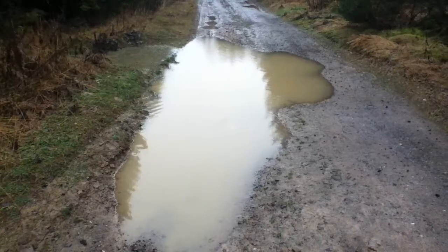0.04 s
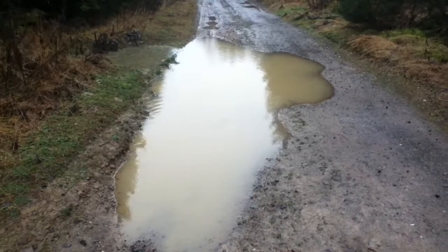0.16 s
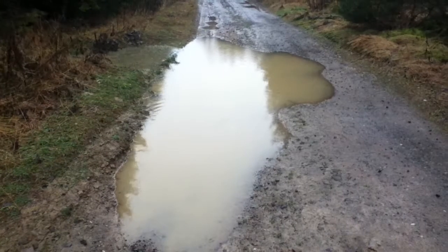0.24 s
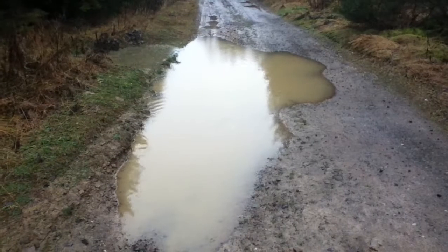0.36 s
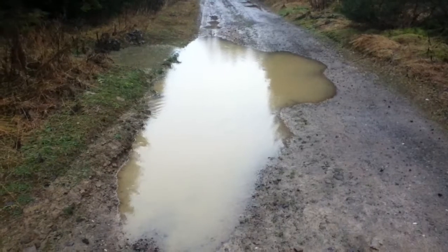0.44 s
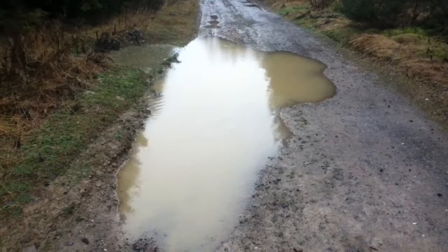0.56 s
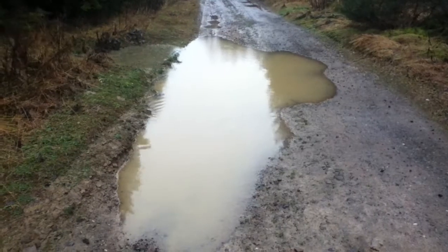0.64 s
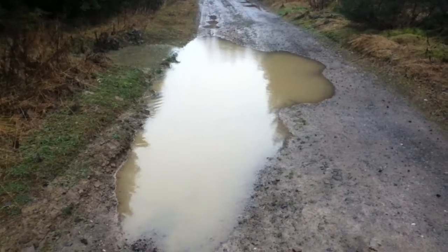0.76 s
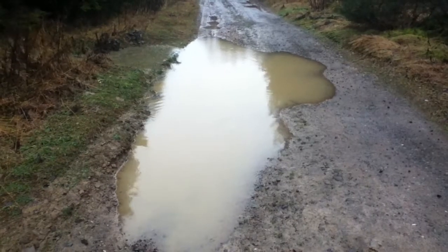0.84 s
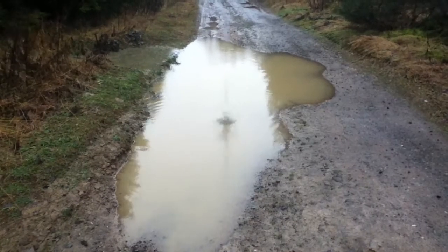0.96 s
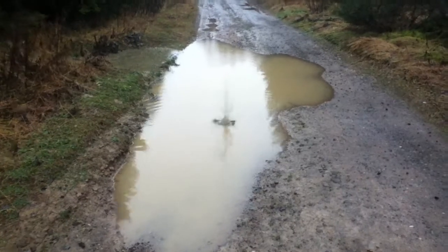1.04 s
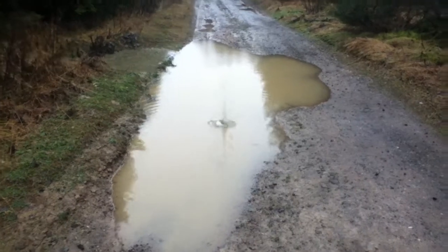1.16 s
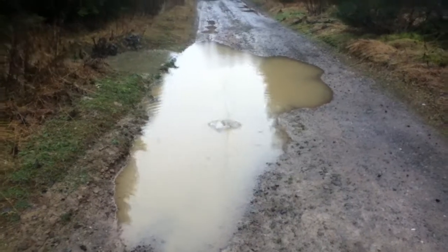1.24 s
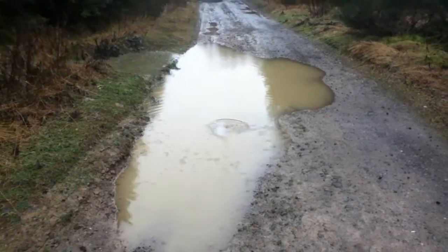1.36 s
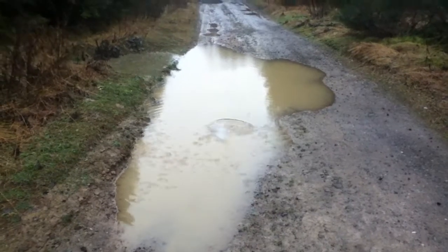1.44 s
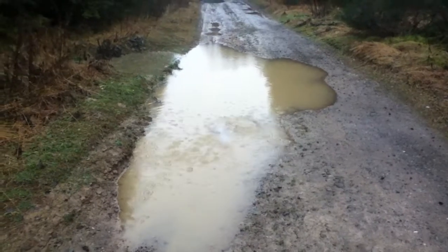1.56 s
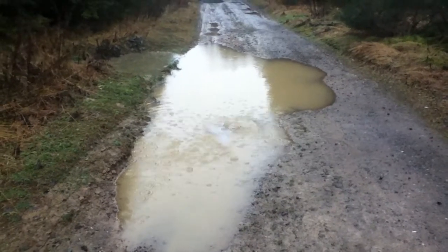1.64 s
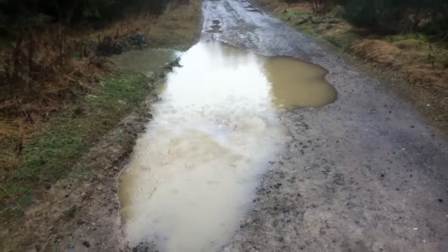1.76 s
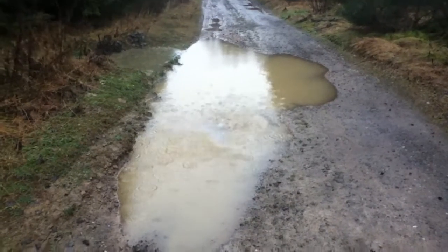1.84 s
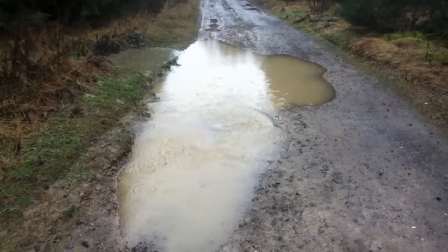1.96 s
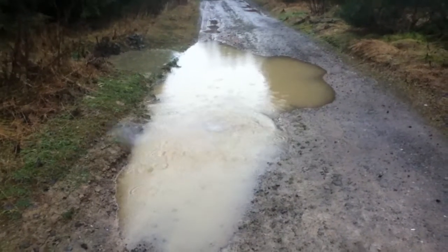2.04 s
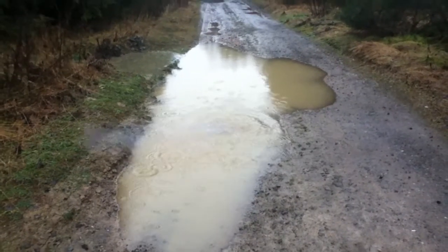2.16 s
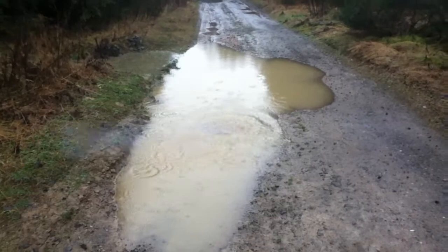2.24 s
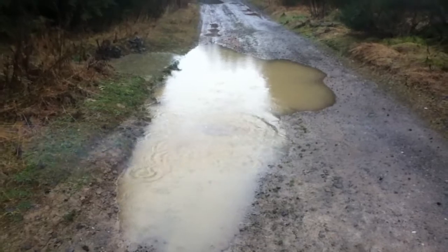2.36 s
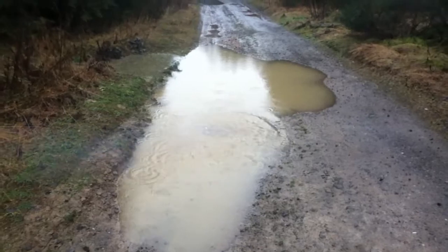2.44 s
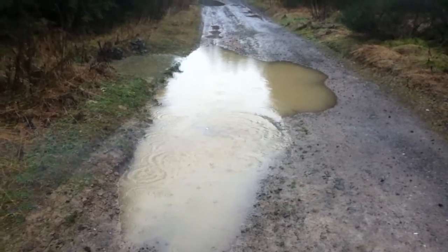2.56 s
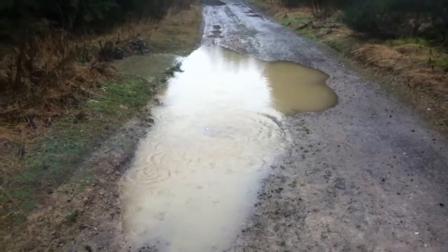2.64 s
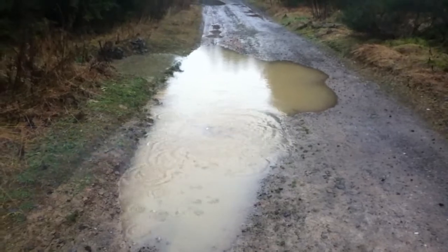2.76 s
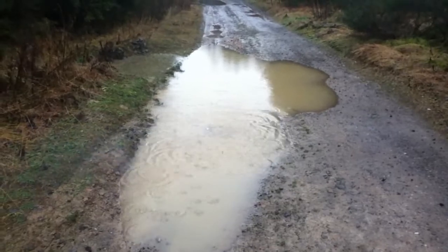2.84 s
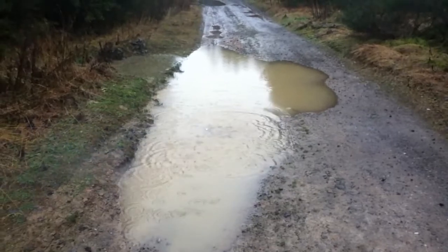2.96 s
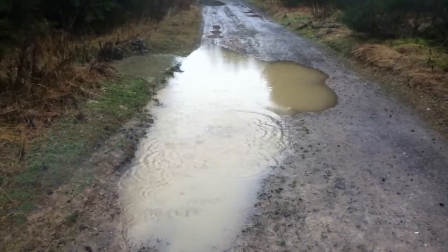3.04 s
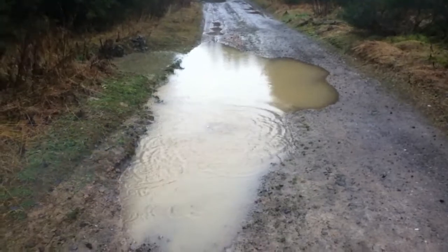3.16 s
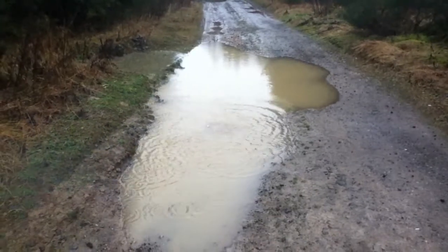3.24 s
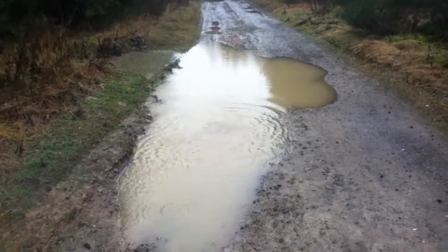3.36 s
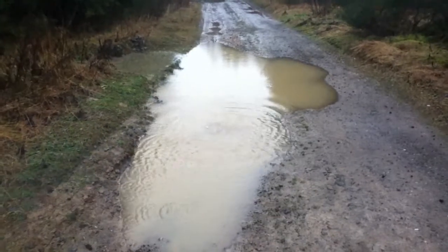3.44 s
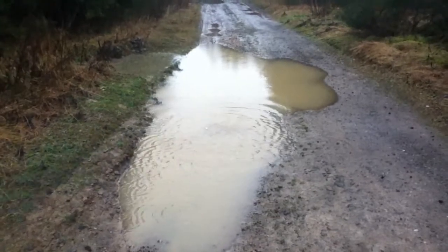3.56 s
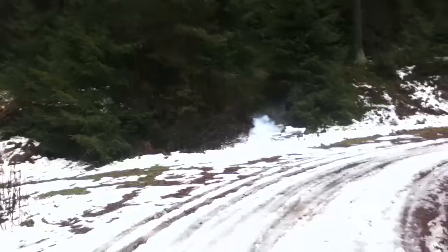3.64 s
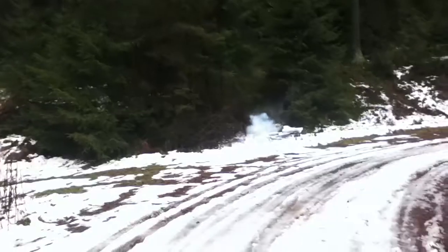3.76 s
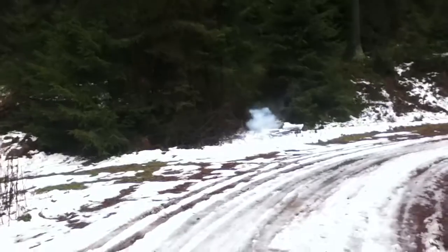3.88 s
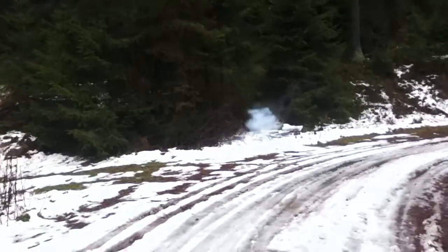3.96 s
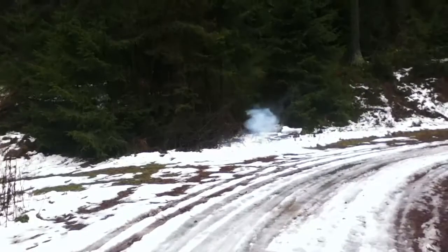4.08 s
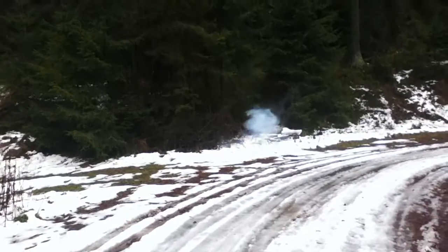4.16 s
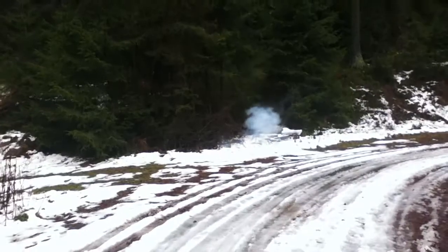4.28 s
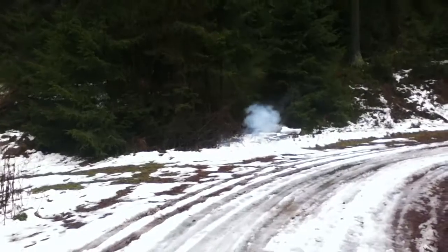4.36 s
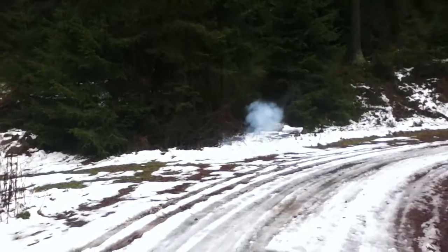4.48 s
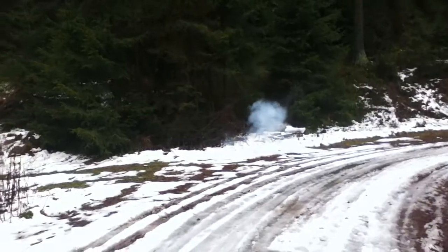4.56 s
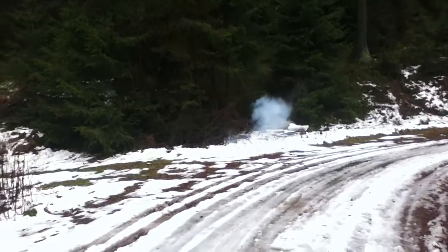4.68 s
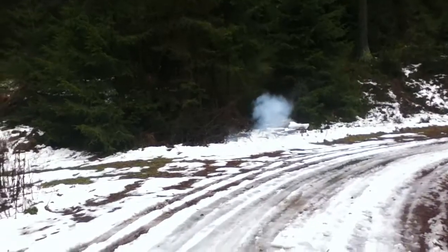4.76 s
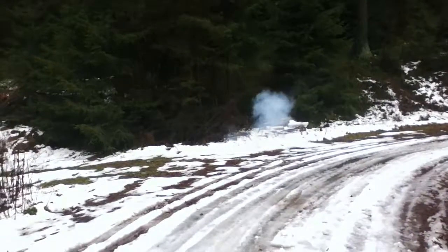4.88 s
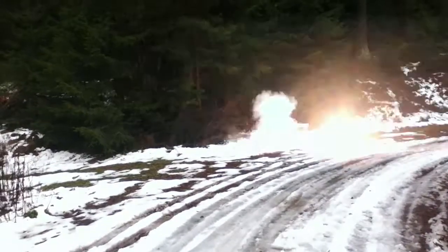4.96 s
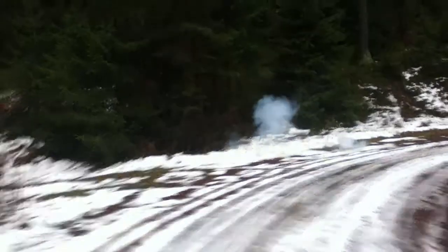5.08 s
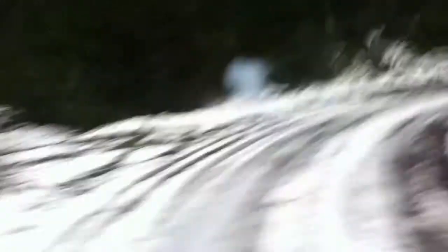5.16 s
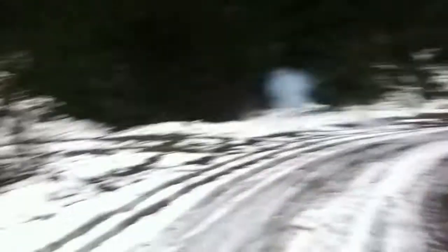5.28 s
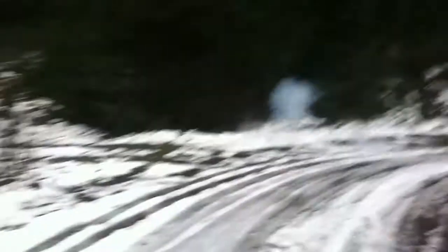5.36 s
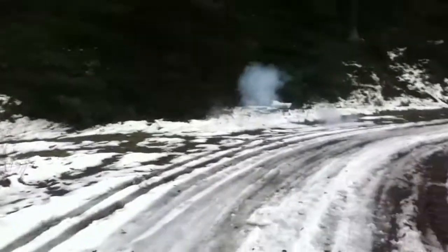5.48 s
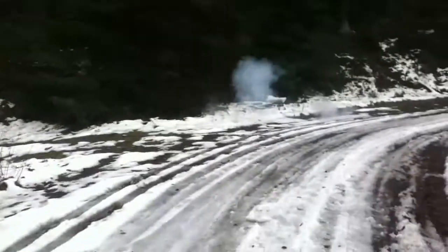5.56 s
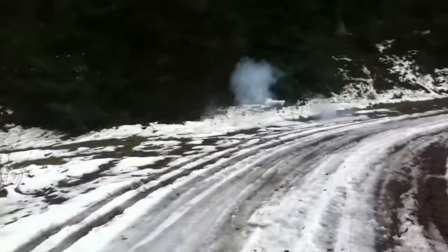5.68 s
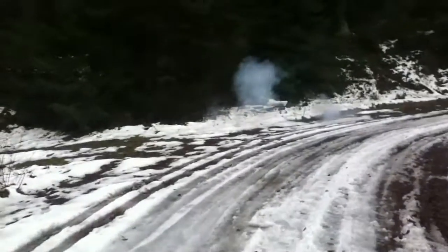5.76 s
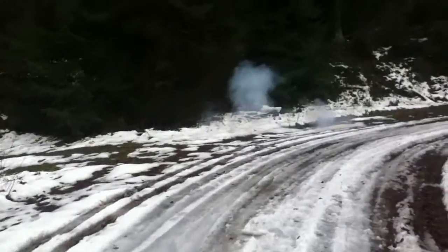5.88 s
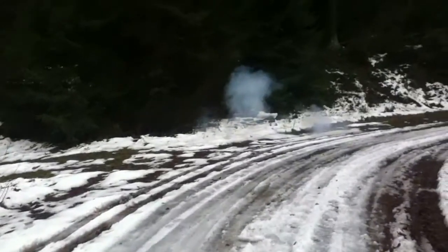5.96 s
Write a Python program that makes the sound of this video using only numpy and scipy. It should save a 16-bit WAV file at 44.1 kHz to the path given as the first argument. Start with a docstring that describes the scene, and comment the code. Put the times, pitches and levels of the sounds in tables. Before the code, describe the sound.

Two firecrackers on woodland tracks, heard on a small overloading microphone. First quiet air and wind bumps, then a blunt splashy explosion in a puddle, followed by a spatter of bubbly drops thinning to drips and stray clicks. The place changes abruptly to a snowy forest with a dull, hollow echo fading and light rustling. A hard, crackling bang follows, with rapid slapback shocks and a long grainy rumble still sounding at the end.

```python
"""Two firecrackers on forest tracks

Wind bumps a small microphone; a cracker heaves and bursts a puddle, and the thrown water patters back as
decaying noise and rising bubble chirps. The scene jumps to a snowy wood where an earlier echo still rolls:
filtered noise, each band dying at its own rate. Soft hisses pass, then a second cracker bangs as flat-topped
shocks and the trees scatter it. A limiter ducks the loudest moments."""
import sys
import numpy as np
from scipy import signal
from scipy.io import wavfile
from scipy.ndimage import uniform_filter1d, minimum_filter1d

SR = 44100
rng = np.random.default_rng(int(sys.argv[2]) if len(sys.argv) > 2 else 0)


def waveform_to_disk(signal):
    """Save audio, clipped to [-1, 1], as 16-bit WAV at the path in sys.argv[1]."""
    frames = np.transpose(np.atleast_2d(signal))
    scaled = np.clip(frames, -1, 1) * 32767
    samples = np.round(scaled).astype(np.int16)
    wavfile.write(sys.argv[1], SR, samples)


N = 265305
TIME = np.arange(N) / SR
PUDDLE_S, JUMP_S, BANG_S = 1.0365, 3.599, 5.1233   # puddle blast, jump to the wood, onset of the bang's echo


def from_db(db):
    """A level in decibels is twenty times the logarithm of the amplitude ratio."""
    return 10 ** (np.asarray(db) / 20)


def rms_one(x):
    """Normalise to unit root-mean-square amplitude."""
    return x / np.sqrt(np.mean(x ** 2) + 1e-20)


def at_hz(points, hz):
    """Interpolate a curve along logarithmic frequency."""
    curve_hz, values = np.transpose(points)
    return np.interp(np.log(hz), np.log(curve_hz), values)


def passed(x, hz, kind, order=2):
    """A Butterworth filter has a maximally flat pass band."""
    corner_hz = np.clip(hz, 10, .45 * SR)
    sections = signal.butter(order, corner_hz, kind, fs=SR, output="sos")
    return signal.sosfilt(sections, x + 1e-18)


def dying(age, t60):
    """Exponential decay by 60 dB in t60 seconds, silent before age zero."""
    return (age >= 0) * np.exp(-np.log(1000) * np.maximum(age, 0) / t60)


def bell(age, width):
    """A Gaussian envelope of height 1 at age zero; width is its standard deviation."""
    return np.exp(-.5 * (age / width) ** 2)


def drift(rate):
    """Two equal low-pass poles at rate (Hz) turn white noise into a smooth random curve of unit rms."""
    step = 40   # samples between the points of the slow curve
    pole = np.exp(-2 * np.pi * rate * step / SR)
    white = rng.standard_normal(N // step + 2002)
    slow = signal.lfilter([1], [1, -2 * pole, pole * pole], white)[2000:]   # skip the settling
    return np.interp(np.arange(N) / step, np.arange(len(slow)), rms_one(slow))


def bands(spectrum, grain_db=0):
    """Third-octave noise bands summing to unit power, and their centres; grain makes single arrivals stand out."""
    edges = np.geomspace(22, 15900, 29)
    centres = np.sqrt(edges[1:] * edges[:-1])
    gains = from_db(at_hz(spectrum, centres))
    grain = from_db(grain_db * rng.standard_normal(N))
    white = rms_one(rng.standard_normal((2, N)) * grain)
    # neighbouring bands draw on different noises
    rows = np.array([gain * passed(white[k % 2], edges[k:k + 2], "band", order=3)
                     for k, gain in enumerate(gains)])
    return rows / rows.sum(axis=0).std(), centres


def noise(spectrum):
    """Stationary coloured noise of unit rms is the sum of its bands."""
    return bands(spectrum)[0].sum(axis=0)


def add(out, s, sound):
    """Superpose a short sound at time s."""
    start = int(np.clip(round(s * SR), 0, N))
    out[start:start + len(sound)] += sound[:N - start]


def puddle_air():
    """The hiss of the air among the trees at the puddle is broadband noise of slowly changing level."""
    # spectral density of the hiss: f/Hz, density/dB
    air_colour = [(18, -30), (30, -4), (147, -2), (374, -8), (567, -3), (859, -7), (1480, -12.5),
                  (2080, -17), (4090, -20.5), (6360, -21.5), (15000, -27.5)]
    # level of the hiss: t/s, level/dB
    air_level = [(0, -48), (1.0, -49), (1.6, -55), (3.6, -49)]
    times, levels = np.transpose(air_level)
    return from_db(np.interp(TIME, times, levels)) * noise(air_colour)


def wood_air():
    """The air of the snowy wood is steady broadband noise."""
    # spectral density of the hiss: f/Hz, density/dB
    wood_colour = [(30, -14), (120, 3), (400, 0.5), (1200, -1), (3000, -11), (8000, -23), (15000, -34.5)]
    return from_db(-41.0) * noise(wood_colour)


def hissing(rise_share=0.23):
    """Noise under a gamma envelope: each hiss swells quickly and fades more slowly."""
    # soft hisses in the snowy wood: t/s, peak level/dB, length/s
    hiss_table = [(4.162, -44, 0.096), (4.354, -53.5, 0.33), (4.694, -48.5, 0.48), (5.72, -45, .02),
                  (5.81, -44, 0.023), (5.913, -47, .3)]
    # spectral density of a hiss: f/Hz, density/dB
    hiss_colour = [(500, -34), (2500, -6), (4500, 1.5), (7000, -5.5), (11000, -7), (15000, -24)]
    level = np.zeros(N)
    for s, db, length in hiss_table:
        age = np.maximum(TIME - s, 0) / (rise_share * length)   # in rise times
        level += from_db(db) * age * np.exp(1 - age)
    return level * noise(hiss_colour)


def wind(breeze_db=-63, eddy_cycles=0.51):
    """Turbulent pressure swells in gusts, and single eddies rock the diaphragm for a cycle or two."""
    # gusts on the microphone: t/s of the peak, level/dB, Gaussian width/s
    gust_table = [(0, -44.5, 0.06), (0.729, -26, 0.045), (0.896, -34.5, 0.046)]
    # single eddies: t/s, level/dB, f/Hz
    eddy_table = [(0.01, -27.5, 96), (.088, -28, 99), (.71, -14, 136), (.735, -10.5, 180),
                  (.755, -11.5, 152), (0.831, -15.5, 128), (2.92, -35, 87.4)]
    # spectral density of the turbulence: f/Hz, density/dB
    wind_colour = [(25, -7), (70, -4), (135, 0), (220, -5), (400, -21), (1000, -39), (4000, -76)]
    gusts = sum(from_db(db) * bell(TIME - s, width) for s, db, width in gust_table)
    out = (from_db(breeze_db) + gusts) * noise(wind_colour)
    for s, db, hz in eddy_table:
        age = TIME - s
        phase = rng.uniform(0, 2 * np.pi)
        out += from_db(db) * bell(age, eddy_cycles / hz) * np.cos(2 * np.pi * hz * age + phase)
    return out


def ticks(spread=1.25, grit_db=-14):
    """An impulsive contact and its brief gritty decay excite a band around a pitch of their own."""
    # sharp slaps, ticks and crunches close by: t/s, peak level/dB, centre f/Hz, t60/s
    tick_table = [(0.7134, -18.5, 1430, 0.015), (1.3925, -33, 2160, 0.12), (1.5002, -30.5, 3330, .025),
                  (2.034, -39, 1630, 0.034), (2.4967, -30.5, 1760, 0.014), (2.6444, -28.5, 7650, 0.012),
                  (2.8882, -30, 4000, 0.027), (2.915, -35.5, 3340, .04), (2.977, -25.5, 1320, 0.0086),
                  (3.364, -31.5, 1900, 0.0092), (3.526, -25, 2180, 0.009)]
    out, age = np.zeros(N), TIME[:SR // 10]
    for s, db, hz, t60 in tick_table:
        grit = from_db(grit_db) * rng.standard_normal(len(age)) * dying(age, t60)
        force = (age == 0) + grit
        crack = passed(force, [hz / spread, hz * spread], "band", order=1)
        crack = passed(crack, 2 * hz, "low")
        add(out, s, from_db(db) * crack / np.abs(crack).max())
    return out


def bubble(hz, width, rise=0.21):
    """A bubble's resonance swells and shoots up in pitch as it meets the surface of the shallow water."""
    age = np.arange(-3 * width, 3 * width, 1 / SR) / width
    pitch = np.minimum(hz * np.exp(rise * age), .45 * SR)
    return np.sin(2 * np.pi * np.cumsum(pitch) / SR) * bell(age, 1)


def falling_water(size_db=3.5, fine_db=3, fine_hz=3400, fine_width=0.00077, slap_db=-4,
                  splat_db=-11, splat_t60=0.016, wash_db=-60):
    """Random impacts: big drops chirp and splat, fine spray adds small slaps and bubbles over a soft wash."""
    # the biggest drops, each pinching off a bubble: t/s, peak level/dB, bubble f/Hz
    drop_table = [(1.456, -34, 3960), (1.476, -37.5, 5100), (1.5355, -34.5, 2860), (1.594, -31.5, 4300),
                  (1.678, -35, 3980), (1.695, -34.5, 2500), (1.7273, -34, 5700), (1.737, -29, 5530),
                  (1.759, -24.5, 4140), (1.7949, -29, 4560), (1.874, -37, 6400), (1.93, -36.5, 7450),
                  (1.9736, -34.5, 7800), (2.035, -41, 2140), (2.755, -43.5, 2340), (3.157, -44, 1580)]
    bubble_cycles = 3.62   # Gaussian width of a big bubble's ring
    # the thrown water lands around one mean flight time, then stray drips go on
    flight_s, flight_spread_s = .6, 0.16
    shower_per_s, drips_per_s = 380, 14
    spray_level_db, drip_db = -50.5, -2   # stray drips relative to the spray
    shower = bell(TIME - PUDDLE_S - flight_s, flight_spread_s)
    per_s = shower_per_s * shower + drips_per_s * (TIME > PUDDLE_S + flight_s)
    spray_db = spray_level_db + drip_db * (1 - shower)

    chirps, hits = np.zeros(N), np.zeros(N)
    for s, db, hz in drop_table:
        chirp = bubble(hz, bubble_cycles / hz)
        add(chirps, s - len(chirp) / 2 / SR, from_db(db) * chirp)   # centred on s
        add(hits, s, from_db([db + splat_db]))

    born = np.flatnonzero(rng.random(N) < per_s / SR)
    chances = np.clip(rng.standard_normal((len(born), 4)), -2, 2)
    for i, (pitch, size, force, depth) in zip(born, chances):
        hz = fine_hz * np.exp(.45 * pitch)
        fine = bubble(hz, fine_width * np.exp(.5 * depth), rise=0.088)
        add(chirps, i / SR, from_db(spray_db[i] + fine_db + size_db * size) * fine)
        hits[i] += from_db(spray_db[i] + slap_db + size_db * force)

    hiss = rms_one(passed(rng.standard_normal(N), [1200, 7000], "band"))
    splats = signal.fftconvolve(hits, dying(TIME[:SR // 20], splat_t60))[:N]
    return chirps + (splats + from_db(wash_db) * shower) * hiss


def puddle_blast(shock_db=8, shock_width=0.00017, heave_db=8, heave_hz=180, heave_t60=0.017,
                 burst_db=-4, burst_t60=0.023, tail_db=-25.0, tail_t60=0.47):
    """Water rounds the shock; the gas cavity oscillates as it heaves, then bursts through the surface."""
    # spectral density of the burst: f/Hz, density/dB
    splash_colour = [(40, -12), (130, 8.5), (400, 0), (900, 5), (2200, 2), (4000, -6), (9000, -20),
                     (15000, -31)]
    # spectral density of the lingering tail: f/Hz, density/dB
    splash_echo = [(40, -14), (130, 8.5), (400, -3.5), (900, -7.5), (2200, -8), (4000, -11), (9000, -24),
                   (15000, -42)]
    age = TIME - PUDDLE_S
    shock = -from_db(shock_db) * bell(age / shock_width - 2, 1)
    cavity_age = age - 4 * shock_width
    heave = from_db(heave_db) * np.sin(2 * np.pi * heave_hz * cavity_age) * dying(cavity_age, heave_t60)
    opening = np.clip(age / 0.017, 0, 1)   # the surface tears open over 17 ms
    fade = dying(np.maximum(age - .007, 0), burst_t60)   # holds for 7 ms before it decays
    burst = from_db(burst_db) * np.sqrt(opening) * fade
    tail = from_db(tail_db) * dying(age, tail_t60)
    blast = shock + heave + burst * noise(splash_colour) + tail * noise(splash_echo)
    return passed(blast, 45, "high", order=3)   # so small a cavity radiates no deep bass


def forest_echo(start, spectrum, far_db, near_db, near_t60, build_s, grain_db, clump_db, boom_db, lump_db=1.07):
    """Multiple scattering: near trunks return a dense burst, far ones a long roll that the air dulls."""
    # dying of sound among the trees: f/Hz, t60/s
    forest_t60 = [(80, 2.1), (300, 4.64), (700, 3.63), (1800, 3.28), (4500, 2.14), (8000, 1.29),
                  (14000, 0.44)]
    age = TIME - start
    rows, centres = bands(spectrum, grain_db)
    lumps = from_db(lump_db * drift(37))   # hillsides send the low notes back in lumps
    roll = np.zeros(N)
    for row, hz in zip(rows, centres):
        roll += row * dying(age, at_hz(forest_t60, hz)) * (lumps if hz < 600 else 1)
    boom = from_db(boom_db) * passed(roll, [90, 220], "band")   # short paths keep more of the bass
    near = from_db(near_db) * dying(age, near_t60) * (roll + boom)   # fades on top of the roll's decay
    stands = from_db(clump_db * drift(20))   # trees stand in clumps, so the echoes come in waves
    build = np.clip(age / build_s, 0, 1) ** 2
    return (from_db(far_db) * roll + near) * stands * build


def shocks(sag_hz=130, crack_t60=0.00087):
    """Overload: each shock drives the microphone to a flat top that sags and snaps back; the first crackles."""
    # shock fronts, direct and off the nearest trees: t/s, level/dB, length/s
    shock_table = [(5.1232, 5, 0.0013), (5.1302, -5, 0.0005), (5.1432, -3, 0.0016), (5.1476, 1, 0.00091),
                   (5.1675, 2, 0.00045), (5.1790, 1, 0.0017), (5.1816, 3.5, 0.0011)]
    out, age = np.zeros(N), TIME[:SR // 20]
    for k, (s, db, length) in enumerate(shock_table):
        flat_top = 1.0 * (age < length)
        add(out, s, from_db(db) * passed(flat_top, 5000 if k == 0 else 2500, "low", order=1))
    s, db, length = shock_table[0]   # only the direct front is still sharp
    crackle = passed(rng.standard_normal(len(age)), 3800, "high") * dying(age, crack_t60)
    add(out, s, from_db(db) * crackle)
    return passed(out, sag_hz, "high")


def scene():
    """Superposition of sources: the puddle first, then the snowy wood, alike in both channels."""
    # spectral density of the echo already rolling: f/Hz, density/dB
    old_colour = [(30, -50), (70, -24), (150, -16.5), (250, -9.5), (430, -0.5), (750, -10), (1500, -11),
                  (3000, -15.5), (5000, -23.5), (9000, -38), (13000, -59)]
    # spectral density of the echo of the bang: f/Hz, density/dB
    new_colour = [(30, -27), (70, -11), (140, -14), (250, -3.5), (450, 3.5), (720, -6), (1000, -6.5),
                  (1500, -6), (3000, -9.5), (5000, -13), (9000, -20), (14000, -27)]
    puddle = puddle_air() + wind() + ticks() + falling_water() + puddle_blast()
    old = forest_echo(JUMP_S, old_colour, far_db=-21.5, near_db=-41, near_t60=0.18, build_s=0.0005,
                      grain_db=0.5, clump_db=0.4, boom_db=-17)
    new = forest_echo(BANG_S, new_colour, far_db=-13.5, near_db=-8.0, near_t60=0.96, build_s=0.017,
                      grain_db=5.5, clump_db=0.5, boom_db=9.5)
    wood = wood_air() + hissing() + old + new + shocks()
    return np.tile(np.where(TIME < JUMP_S, puddle, wood), (2, 1))


def record(dry, ceiling_db=1.0, release_db_per_s=17, cutoff_hz=15500):
    """The microphone sheds deep bass; a limiter ducks just ahead of peaks and recovers slowly; the top is cut."""
    x = passed(dry, 69, "high", order=1)
    over = np.maximum(20 * np.log10(np.abs(x[0]) + 1e-9) - ceiling_db, 0)
    # hold the largest excess while it falls at the release rate
    release = release_db_per_s * TIME
    duck = np.maximum.accumulate(over + release) - release
    # a centred window reaches ahead of each peak, and an average smooths the step
    duck = uniform_filter1d(-minimum_filter1d(-duck, size=64), size=64)
    top_cut = signal.ellip(10, .1, 80, cutoff_hz, fs=SR, output="sos")
    return signal.sosfilt(top_cut, x * from_db(-duck))


dry = scene()
out = record(dry)
waveform_to_disk(out)
```